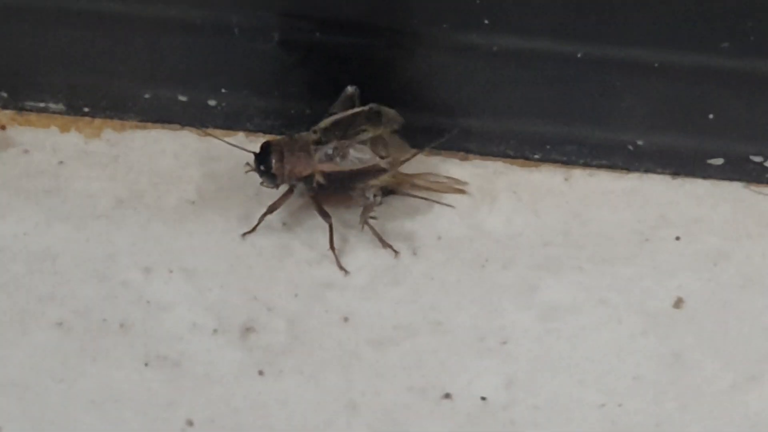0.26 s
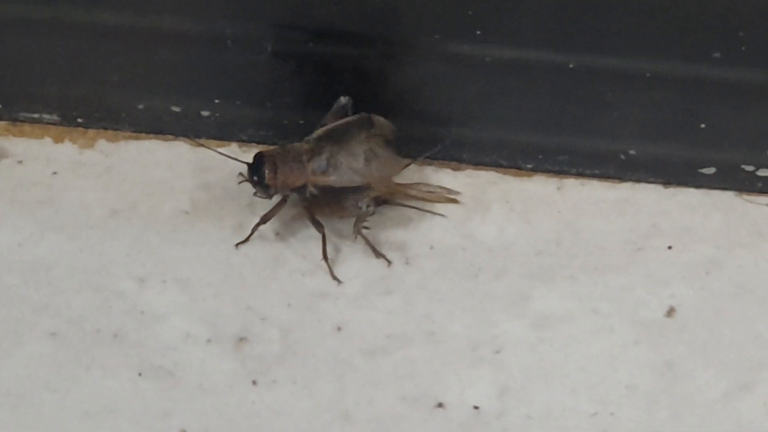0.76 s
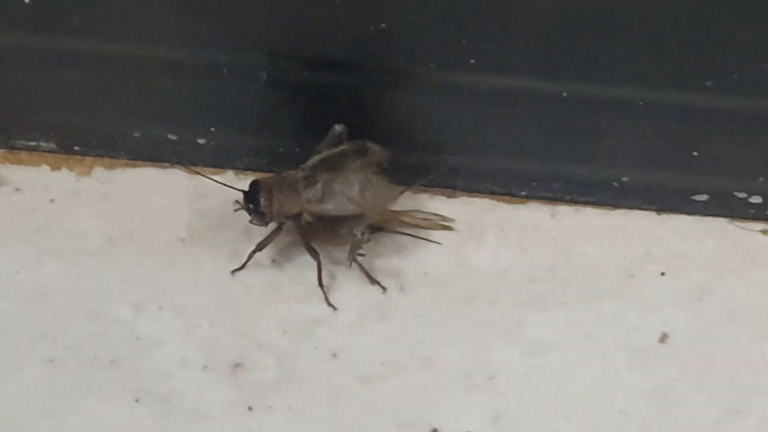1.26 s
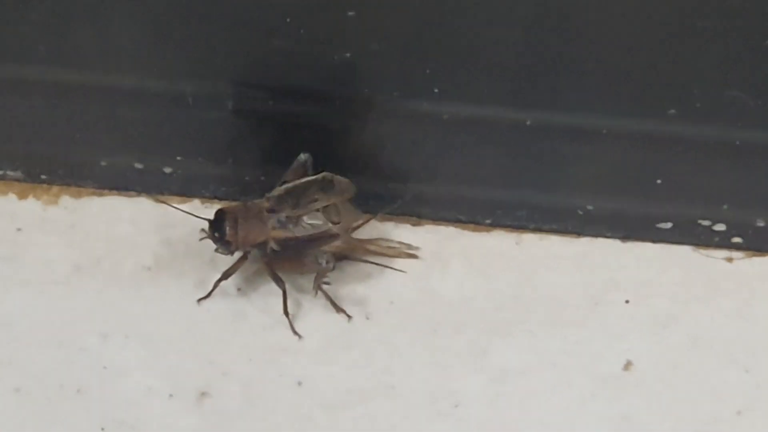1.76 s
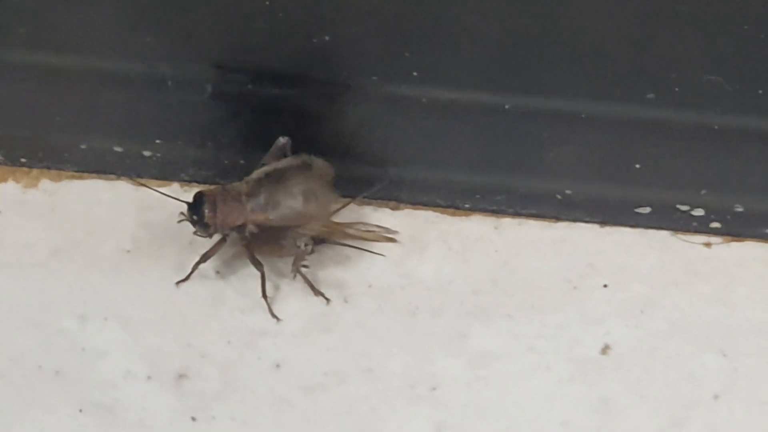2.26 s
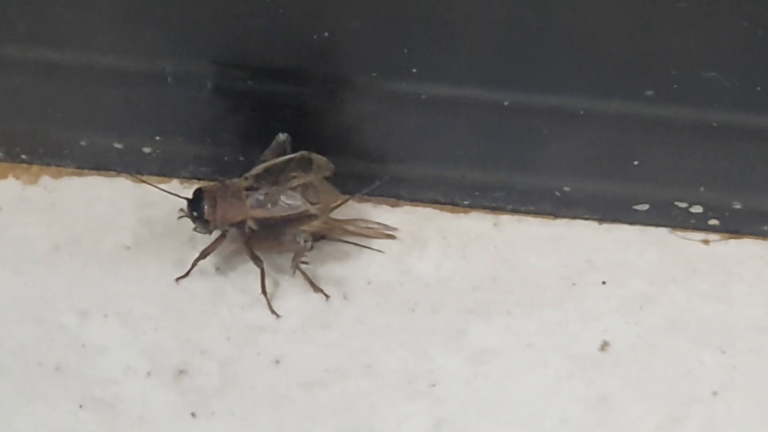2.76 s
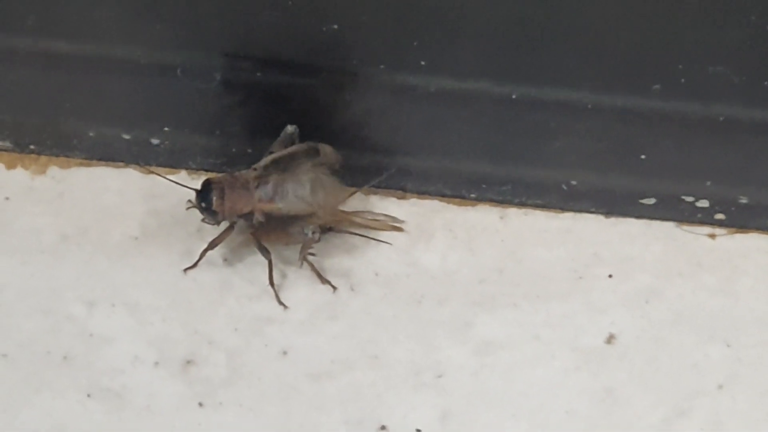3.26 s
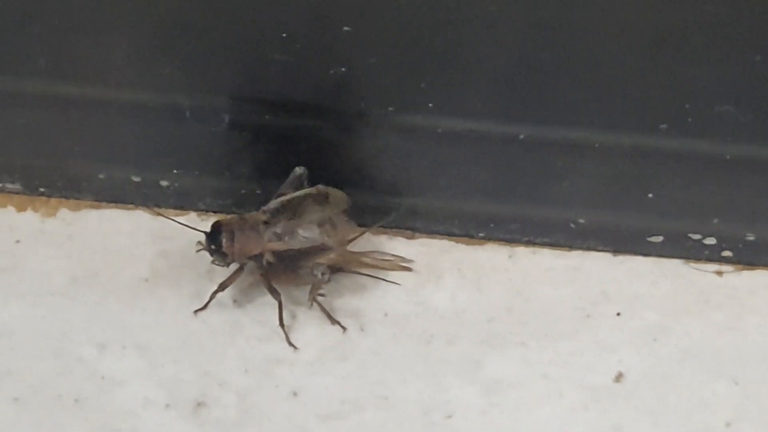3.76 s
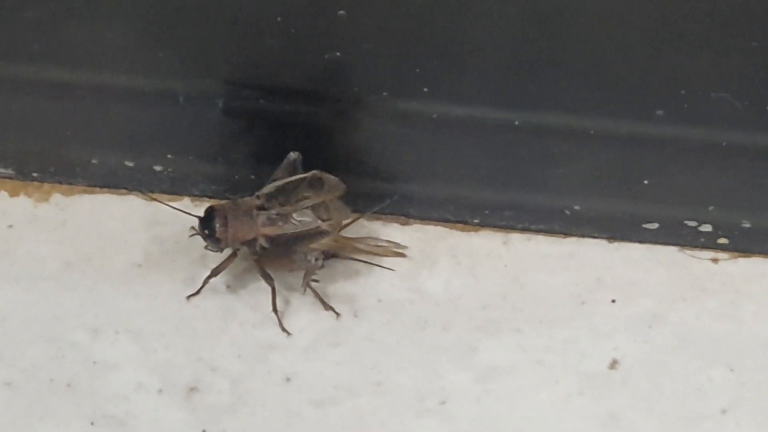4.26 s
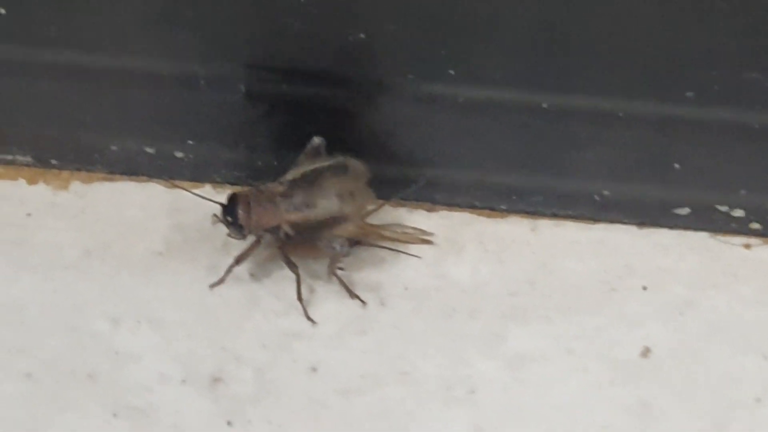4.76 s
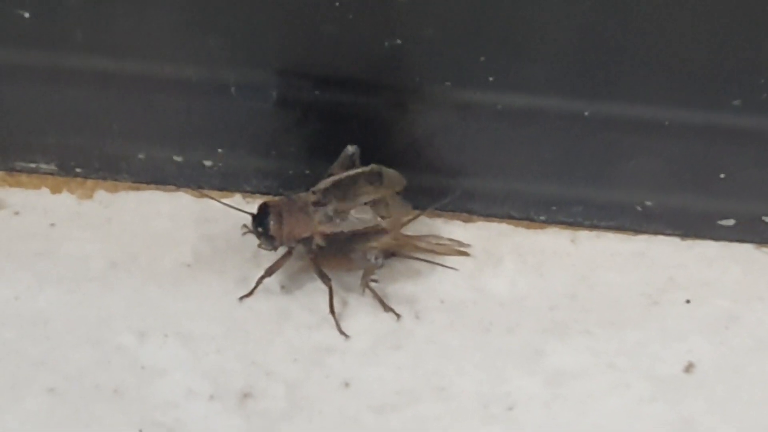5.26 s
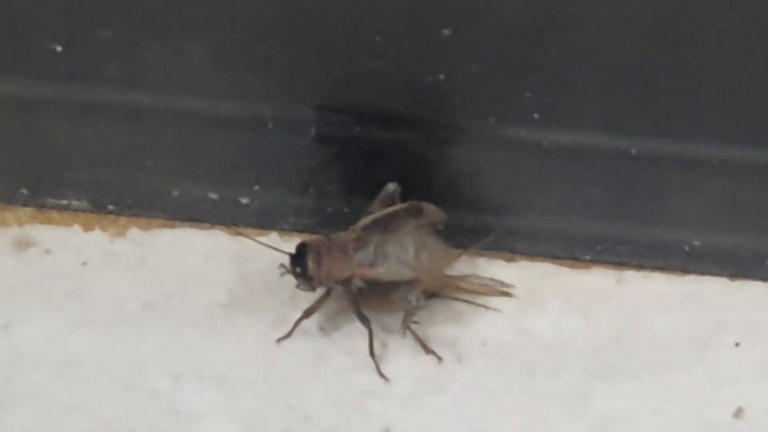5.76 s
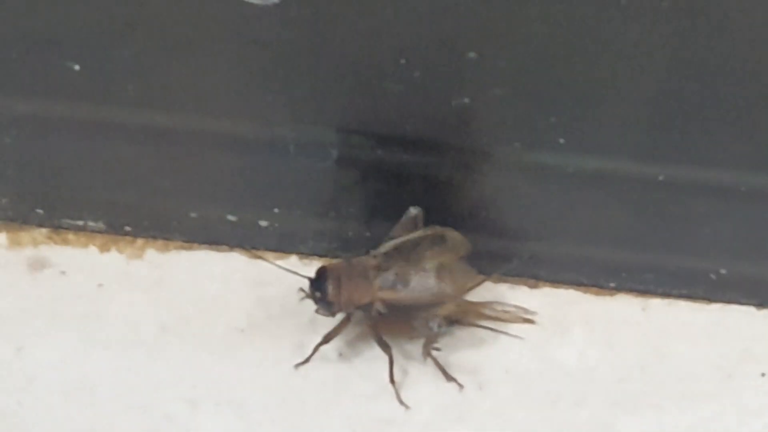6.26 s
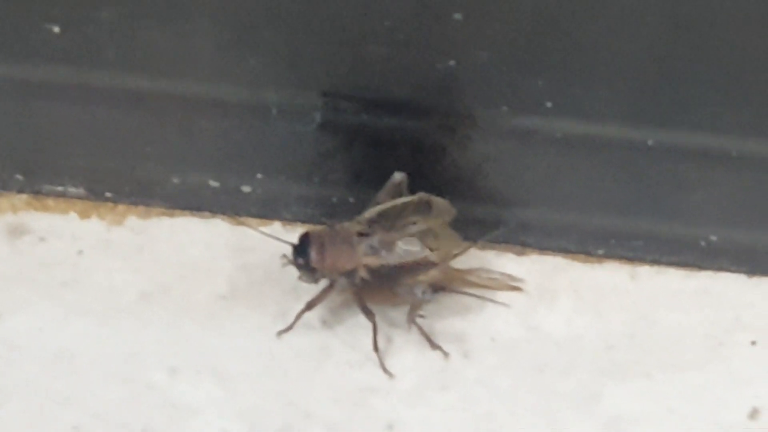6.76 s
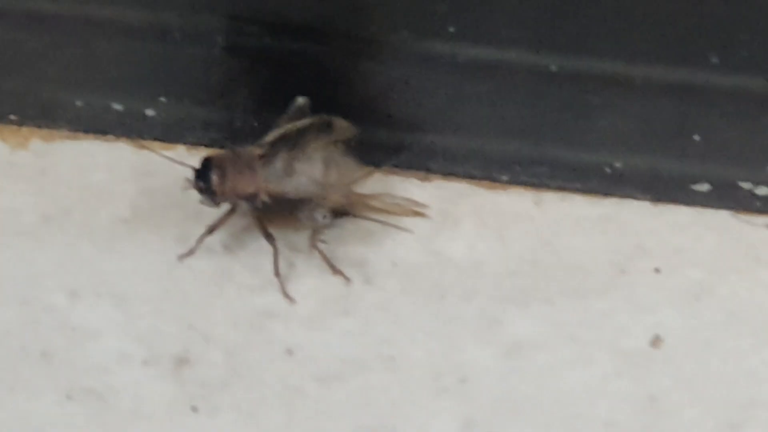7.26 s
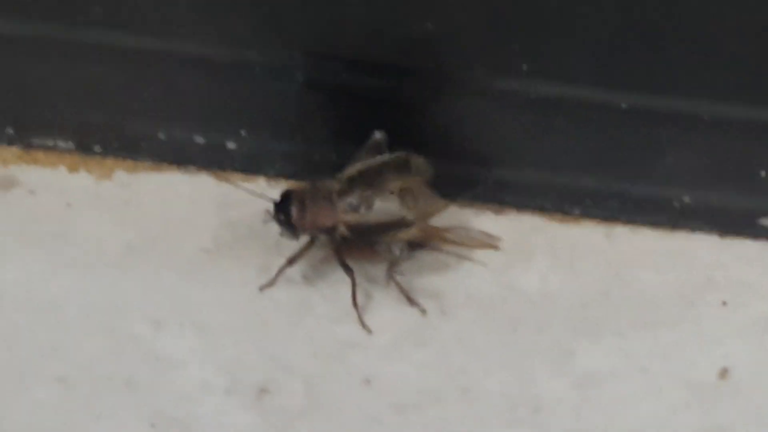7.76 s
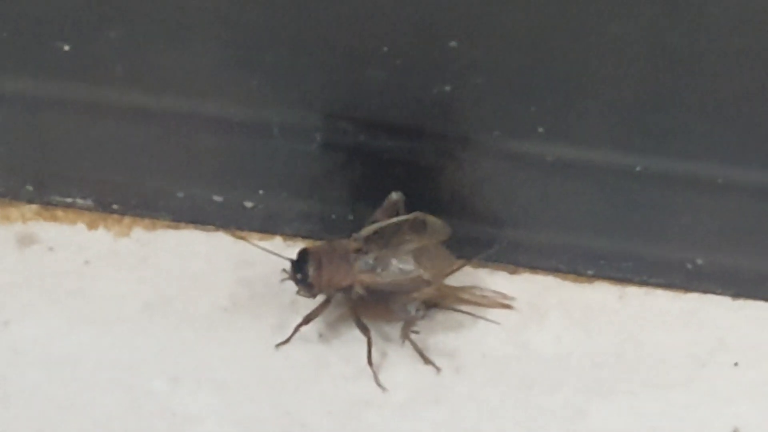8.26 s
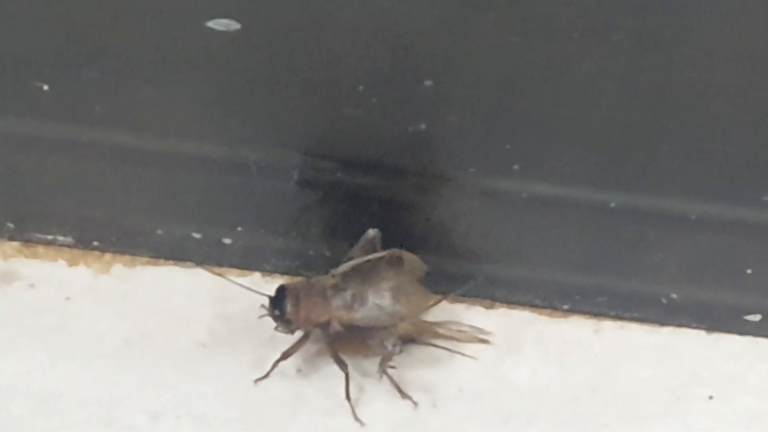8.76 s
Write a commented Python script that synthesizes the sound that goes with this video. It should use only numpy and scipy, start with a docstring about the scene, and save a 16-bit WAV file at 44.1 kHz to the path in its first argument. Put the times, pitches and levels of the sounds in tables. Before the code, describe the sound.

One cricket sings close to a hand-held microphone in a quiet, hard-walled room. Each chirp is a quick ripple of about six high whistled pulses, the first ones crowded and softer, the later ones fuller and slightly falling. Tiny double flicks fill most gaps between chirps. The song continues from start to end, reflecting off the walls, with soft air noise and a wavering low mains hum underneath.

```python
"""A quiet, hard-walled room: a cricket sings at the foot of a wall, close to a hand-held phone.
Each closing wing stroke drags a scraper over a file and rings the wings in a short falling whistle.
Chirps of mostly six growing strokes alternate with one or two soft ones: sines, octave and shaped noise.
Delayed copies and a noise-tail reverb echo the song over soft air noise and a low mains hum."""
import sys
import numpy as np
from scipy import signal
from scipy.fft import rfft, irfft
from scipy.io import wavfile
from scipy.ndimage import uniform_filter1d, map_coordinates

SR = 44100
rng = np.random.default_rng(int(sys.argv[2]) if len(sys.argv) > 2 else 0)


def log_audio(samples):
    """Write samples as a 16-bit WAV file to the path given in sys.argv[1]."""
    # one column per channel
    frames = np.atleast_2d(samples).T
    # limit to full scale, then quantise
    limited = np.clip(frames, -1, 1)
    pcm = np.round(limited * 32767).astype(np.int16)
    wavfile.write(sys.argv[1], SR, pcm)


N = 397782
TIME_S = np.arange(N) / SR

# full chirps, relative level of a full stroke; changeover = third stroke to fourth:
# start_s, stroke_count, level_db, changeover_s
CHIRPS = [(.0656, 6, -11.5, .031), (0.408, 6, -11, 0.039), (0.7623, 6, -11.5, .035), (1.13, 6, -11.5, .036),
          (1.478, 6, -11.5, 0.033), (1.822, 6, -11, 0.029), (2.189, 6, -11.5, 0.026),
          (2.517, 6, -12, 0.027), (2.822, 7, -12, 0.023), (3.2415, 6, -11.9, 0.037), (3.593, 6, -12, .038),
          (3.9449, 6, -11.5, 0.037), (4.2984, 6, -12, 0.033), (4.652, 6, -12.5, 0.026),
          (4.972, 6, -12, 0.027), (5.3163, 6, -13, 0.032), (5.664, 6, -11.5, .0365), (6.0168, 6, -11, .036),
          (6.4595, 6, -11.3, .039), (6.8317, 6, -11.5, 0.035), (7.1863, 6, -11.5, .037),
          (7.568, 6, -13, 0.034), (7.998, 6, -13.7, .032), (8.39, 6, -14.5, 0.041), (8.7766, 6, -14, 0.033)]
# soft wing flicks between chirps, relative level of the first stroke: start_s, stroke_count, level_db
FLICKS = [(.305, 2, -18.5), (.656, 2, -18.5), (1.026, 2, -19), (1.375, 2, -19), (1.721, 2, -19),
          (2.086, 2, -18.5), (2.43, 1, -20), (3.131, 2, -23), (3.489, 2, -22.2), (3.842, 2, -20),
          (4.194, 2, -23), (4.546, 2, -20), (4.8893, 1, -18), (5.209, 2, -24), (5.557, 2, -20),
          (5.912, 2, -19.5), (6.265, 1, -17), (6.354, 2, -17.5), (6.744, 1, -21), (7.082, 2, -19.5),
          (7.463, 2, -18.5), (7.814, 1, -19), (8.283, 2, -22.5), (8.671, 2, -24.5)]
# stroke-to-stroke times, quick while a chirp opens: gap_s
QUICK_GAPS_S = [.019, .0217]
# stroke-to-stroke times once the wings swing fully: gap_s
FULL_GAPS_S = [.0382, .0396, .039]


def strokes():
    """Closing strokes in time order, louder through each chirp or flick: (start_s, level_db, place)."""
    soft_start_db, shortfall_share = -8, 0.44  # each stroke leaves this share of the shortfall
    flick_rise_db = 4  # per stroke
    rows = []
    for start_s, count, full_db, changeover_s in CHIRPS:
        onsets_s = start_s + np.cumsum([0, *QUICK_GAPS_S, changeover_s, *FULL_GAPS_S])
        for place in range(round(count)):
            level_db = full_db + soft_start_db * shortfall_share ** place
            rows.append((onsets_s[place], level_db, place))
    for start_s, count, first_db in FLICKS:
        for place in range(round(count)):
            rows.append((start_s + place * QUICK_GAPS_S[0], first_db + place * flick_rise_db, place))
    return sorted(rows)


# wider swing from stroke to stroke, before scatter and drift: length_s, first_pitch_hz, last_pitch_hz
SWINGS = [(.012, 6750, 6080), (.014, 6840, 6020), (.016, 6890, 5990), (.018, 6940, 5980),
          (.018, 6960, 5980)]
# scraper grip along a stroke, relative amplitudes; octave in a short and in a long stroke:
# stroke_share, tone_amplitude, short_octave_amplitude, long_octave_amplitude
GRIP = [(0, 0.13, 0.18, 0.15), (.15, 0.56, 0.28, 0.21), (.35, 0.95, 0.63, 0.28), (.52, 0.74, 0.79, 0.13),
        (.72, 0.55, 0.88, 0.38), (.9, 0.42, 0.75, 0.82), (1, 0.074, .3, 0.63)]
MID_HZ = 6574  # reference pitch of the drift


def wing_motion():
    """Tooth rate, tone and octave amplitudes, knocks at catch and release, and the wings' opening."""
    bend, pitch_scatter_hz, length_scatter = 1.6, 18, .015
    skip_hz, skip_s = 350, .0009
    hz = np.full(N, float(MID_HZ))
    tone, octave, knocks, opening = np.zeros((4, N))
    share, tone_grip, short_octave, long_octave = np.transpose(GRIP)
    song, widest = strokes(), len(SWINGS) - 1
    for (start_s, level_db, place), chance in zip(song, rng.standard_normal((len(song), 5))):
        place = min(place, widest)
        length_s, first_hz, last_hz = SWINGS[place]
        u = np.linspace(0, 1, int(length_s * (1 + length_scatter * chance[0]) * SR))
        i = int(start_s * SR) + np.arange(len(u))
        # scraper jumps the first teeth, then slows: pitch falls ever faster
        hz[i] = first_hz + (last_hz - first_hz) * u ** bend + pitch_scatter_hz * chance[1]
        hz[i] += skip_hz * np.exp(-u * length_s / skip_s)
        tone[i] = undb(level_db) * np.interp(u, share, tone_grip)
        # a long stroke is purest mid-way; its octave swells towards release
        octave_grip = short_octave + (long_octave - short_octave) * place / widest
        octave[i] = undb(.2 * level_db + chance[2]) * np.interp(u, share, octave_grip)
        knocks[i[[0, -1]]] = undb(2 * chance[3:])
        # wings brush as they open before the stroke, most of all from rest
        opening[i - len(u)] = np.sin(np.pi * u) * (1 if place == 0 else .55)
    return hz, tone, octave, knocks, opening


def membrane(amplitude):
    """Two equal one-pole lags: the wing membrane takes a moment to follow."""
    ring = np.exp(-1 / (.00015 * SR))  # time constant in s
    return signal.lfilter([(1 - ring) ** 2], [1, -2 * ring, ring ** 2], amplitude)


# slow song drift, pitch scaled by mid_pitch_hz / MID_HZ: time_s, mid_pitch_hz
DRIFT = [(0, 6565), (2.6, 6592), (4.6, 6565), (5.05, 6500), (6.2, 6548), (7.3, 6512), (7.7, 6555),
         (9, 6545)]
# colour of scraper on file: freq_hz, density_db_per_hz (relative)
RASP = [(3000, -23), (4600, -31.5), (5600, 13.5), (6600, 2), (7400, 8), (8500, -2), (9700, -0.5),
        (11000, 3), (13500, -20), (14600, -16), (16000, -20)]
# colour of wings brushing each other: freq_hz, density_db_per_hz (relative)
BRUSH = [(4000, -29), (6000, 15), (8500, -13), (10500, 10.5), (13000, -37), (15500, -5)]


def cricket(tone_db=3.5, octave_db=-26.0, rasp_db=-42, knock_db=-32, brush_db=-43):
    """Wing whistle and octave as sines at the tooth rate; file scrape and wing brush as shaped noise."""
    teeth_hz, knock_s, pressure_db = 16, .0007, 2.5
    hz, tone, octave, knocks, opening = wing_motion()
    # uneven teeth shake the pitch
    tooth_rate_hz = hz * curve(DRIFT)[0] / MID_HZ + teeth_hz * walk(1800)
    phase = 2 * np.pi * np.cumsum(tooth_rate_hz) / SR
    tone, octave = membrane(tone), membrane(octave)
    whistle = undb(tone_db + .5 * walk(1200)) * tone * np.sin(phase)
    overtone = undb(octave_db + walk(1500)) * octave * np.sin(2 * phase)
    clicks = signal.lfilter([1], [1, -np.exp(-1 / (knock_s * SR))], knocks)
    # power .25: the file rasps almost as much in a soft stroke as in a loud one
    rasp_force = undb(rasp_db + 2 * walk(700)) * np.abs(tone / tone.max()) ** .25
    force = rasp_force + undb(knock_db) * clicks
    scrape = coloured(force * rng.standard_normal(N), RASP)
    brush = undb(brush_db + 1.99 * walk(900)) * opening * noise(BRUSH)
    # wing pressure wanders from stroke to stroke
    return whistle, overtone, (scrape + brush) * undb(pressure_db * walk(50))


# early reflections from floor and walls, before sway: delay_s, left_db, right_db
ECHOES = [(.0022, -13.5, -2), (.0045, -14.5, -5.5), (0.0126, -13, -10.5), (0.0137, -24, -9.5),
          (0.0285, -21, -6.5), (0.0316, -14, -11.5)]


def room(whistle, overtone, scrape):
    """Direct sound, echoes and reverb at two microphones; left is nearer but shaded in the bright parts."""
    right_lag_s, sway_s = .000425, .00007
    shadow_db, overtone_wall_db, scrape_wall_db = -5.5, -7, -13
    reverb_db = [-7, -1.6]  # left, right
    left = whistle + undb(shadow_db) * (overtone + scrape)
    right = delayed(whistle + overtone + scrape, right_lag_s)
    # bright parts are beamed at the phone; less returns from the walls
    spread = whistle + undb(overtone_wall_db) * overtone + undb(scrape_wall_db) * scrape
    out = []
    for side, direct in enumerate([left, right]):
        early = 0
        for delay_s, *levels_db in ECHOES:
            # the hand sways: every echo path grows and shrinks a little
            early = early + undb(levels_db[side]) * delayed(spread, delay_s + sway_s * walk(1.3))
        out.append(direct + early + undb(reverb_db[side]) * reverb(spread))
    return np.array(out)


def delayed(x, seconds):
    """Sound after a fixed or changing travel time, by cubic interpolation."""
    return map_coordinates(x, [np.arange(N) - seconds * SR], order=3)


def reverb(x):
    """Dense late reflections: four decaying noise tails, remixed as the phone moves through the room."""
    t60_s, build_up_s = .76, .01
    t = np.arange(int(t60_s * SR)) / SR
    decay = undb(-60 * t / t60_s) * (1 - np.exp(-(t / build_up_s) ** 2))
    tails = rng.standard_normal((4, len(t))) * decay / np.linalg.norm(decay)
    weights = np.array([walk(2) for _ in tails])
    weights /= np.linalg.norm(weights, axis=0)
    # song already under way: its end is put in front, so the room rings from the first moment
    ongoing = np.concatenate([x[1 - len(t):], x])
    return sum(w * signal.oaconvolve(ongoing, tail, "valid") for w, tail in zip(weights, tails))


# colour of background air: freq_hz, density_db_per_hz (relative)
AIR = [(25, -18), (42, -7), (62, -14), (88, 4.5), (108, -11.5), (135, -6), (200, -8.5), (330, -14),
       (650, -17.5), (1100, -22.5), (2200, -22), (3500, -31.5), (8000, -31), (15000, -81)]
# likeness of the air at the two microphones: freq_hz, correlation
AIR_LIKENESS = [(100, 0.92), (180, 0.9), (350, 0.76), (700, 0.54), (1400, -0.15), (2800, -0.012),
                (6000, -0.096)]


def air_noise():
    """Soft air noise from mid and side noises, alike at both microphones in the bass."""
    air_db, left_treble_db = -50, -5.0  # rms before tilt; left over right
    likeness = np.clip(by_frequency(AIR_LIKENESS), -1, 1)
    mid = rfft(noise(AIR)) * np.sqrt((1 + likeness) / 2)
    side = rfft(noise(AIR)) * np.sqrt((1 - likeness) / 2)
    tilt_db = by_frequency([(500, 0.016), (1600, left_treble_db)]) / 2
    left, right = (mid + side) * undb(tilt_db), (mid - side) * undb(-tilt_db)
    return undb(air_db) * irfft(np.array([left, right]), N)


# mains and motor hum, level before waver: freq_hz, level_db_rms, waver_db
HUM = [(98, -57, 3), (123, -61, 3), (148.5, -58, 2)]
# level of the lowest hum: time_s, level_db_rms
THROB = [(0.0, -62), (0.43, -51), (1.05, -50), (1.56, -71), (3.32, -46.5), (4.04, -61.5), (5.17, -46.5),
         (5.35, -53), (6.81, -67), (6.91, -61), (7.69, -53), (8.14, -60), (8.99, -52), (9.02, -49)]


def mains_hum():
    """Low sines of mains and motors, wavering in level and phase, the same at both microphones."""
    hum = undb(curve(THROB)[0]) * np.sin(2 * np.pi * 49 * TIME_S + 0.28 * walk(3.33))
    for hz, level_db, waver_db in HUM:
        level = undb(level_db + waver_db * walk(2.96))
        hum = hum + level * np.sin(2 * np.pi * hz * TIME_S + walk(3.7))
    return np.sqrt(2) * hum  # rms to peak


def undb(db):
    """Decibels to amplitude."""
    return 10 ** (np.asarray(db) / 20)


def curve(rows):
    """Each column of a (time_s, ..) table as a signal."""
    time_s, *columns = np.transpose(rows)
    return [np.interp(TIME_S, time_s, column) for column in columns]


def walk(rate_hz):
    """Random levels held 1 / rate_hz s and smoothed twice over that time; spread near 1."""
    hold = int(SR / rate_hz)
    steps = np.repeat(rng.standard_normal(N // hold + 1), hold)
    return 1.44 * uniform_filter1d(uniform_filter1d(steps, hold), hold)[:N]


def by_frequency(points):
    """A (freq_hz, value) table spread over spectrum bins, on a log frequency axis."""
    hz, value = np.transpose(points)
    return np.interp(np.log(np.arange(N // 2 + 1) * SR / N + 1), np.log(hz), value)


def coloured(x, points):
    """Sound filtered to (freq_hz, db) points; white noise keeps its level."""
    gain = undb(by_frequency(points))
    return irfft(rfft(x) * gain / np.sqrt(np.mean(gain ** 2)), N)


def noise(points):
    """Noise of rms 1 with the colour of (freq_hz, db) points."""
    return coloured(rng.standard_normal(N), points)


def scene():
    """The cricket in its room, over air and hum."""
    return room(*cricket()) + air_noise() + mains_hum()


def record(dry):
    """The phone cuts the top: steep elliptic low-pass."""
    top_hz, ripple_db, stop_db = 15750, .2, 80
    return signal.sosfilt(signal.ellip(10, ripple_db, stop_db, top_hz, fs=SR, output="sos"), dry)


dry = scene()
out = record(dry)
log_audio(out)
```